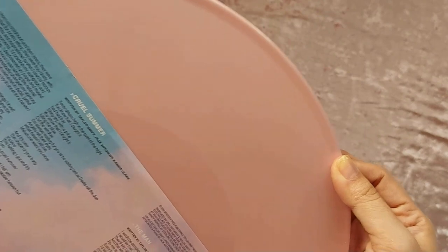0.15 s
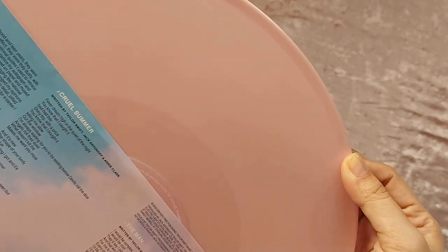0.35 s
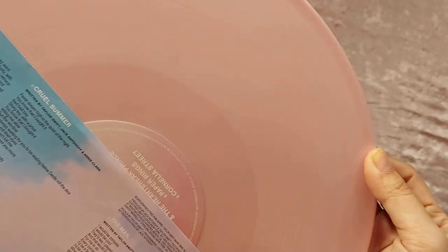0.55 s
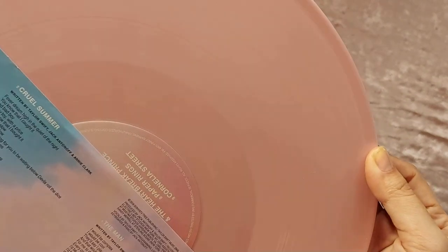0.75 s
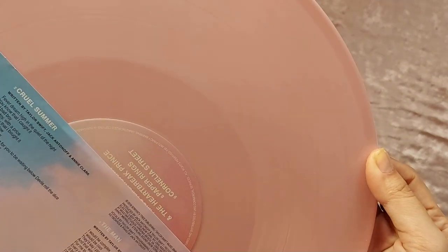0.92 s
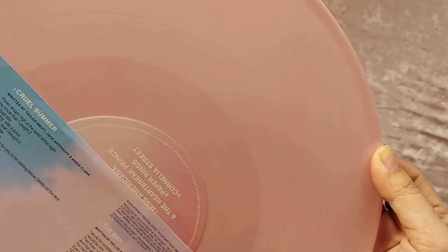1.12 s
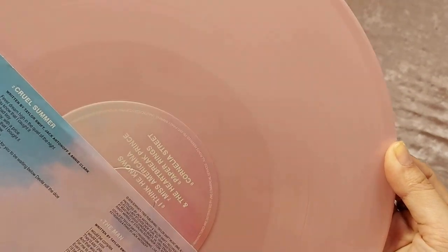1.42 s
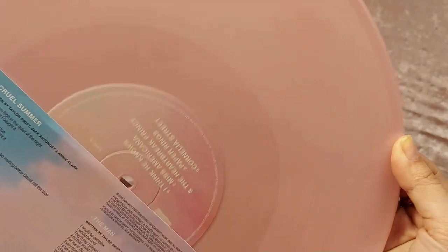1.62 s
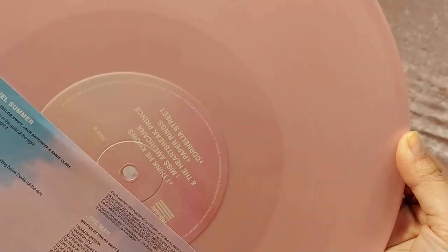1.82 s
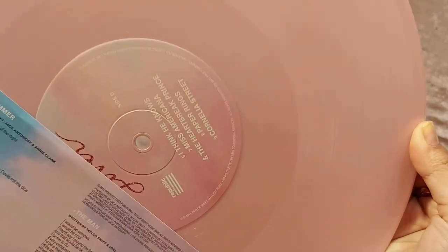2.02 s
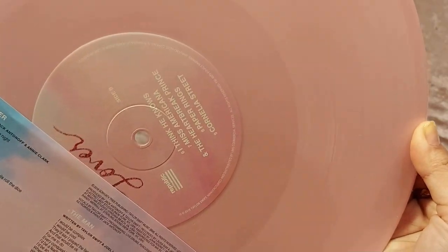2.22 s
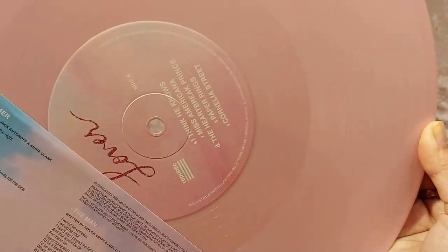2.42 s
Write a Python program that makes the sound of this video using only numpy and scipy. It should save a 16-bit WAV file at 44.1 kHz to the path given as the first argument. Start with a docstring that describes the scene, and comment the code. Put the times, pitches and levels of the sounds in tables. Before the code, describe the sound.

Dry, squeaky paper scraping as a record is eased from its sleeve, close in a quiet room

```python
"""A dry, squeaky paper scrape comes first, close to the microphone in a quiet room with a low hum of air.
A vinyl record is eased out of a paper sleeve in six short tugs: each is hiss mixed with thousands of tiny
gliding whistles, as paper fibres stick and slip. Clear squeaks are bending tones with an octave;
faint rubs, mostly between tugs, are narrow bands of noise, and ticks are very short noise bursts.
The hardest tug overloads the input, which thickens it into a knock."""
import sys
import numpy as np
from scipy import signal
from scipy.fft import rfft, irfft
from scipy.io import wavfile
from scipy.ndimage import uniform_filter1d

SR = 44100
rng = np.random.default_rng(int(sys.argv[2]) if len(sys.argv) > 2 else 0)


def transcribe(u):
    """Save the signal u as a 16-bit wav file named by the first command-line argument.

    u: samples, shape (n,) or (channels, n), limited to [-1, 1]; the rate is SR.
    q: integer samples, one column per channel.
    """
    v = np.clip(np.atleast_2d(u).T, -1, 1)
    q = np.round(v * 32767).astype(np.int16)
    wavfile.write(sys.argv[1], SR, q)


def attenuation_scalar(level_db):
    """Turn a level in dB into a linear amplitude multiplier (20 dB per decade)."""
    decades = np.asarray(level_db, float) / 20
    return 10 ** decades


N = 112454  # length in samples, about 2.55 s

JUDDER_DB = 2.2  # rms depth of the uneven grip
JUDDER_WINDOW = 133  # samples, 3 ms
STREAK_DB = 3.3  # rms depth of the streaks that the sheet's many modes leave across the spectrum


def evened(x):
    """Scales a sound to an rms of 1."""
    return x / np.sqrt(np.mean(x ** 2) + 1e-20)


def slow(size, window):
    """Noise smoothed twice over a window of so many points, at an rms of 1."""
    once = uniform_filter1d(rng.standard_normal(size), window)
    return evened(uniform_filter1d(once, window))


def coloured(x, points):
    """Gives x the spectrum of a (Hz, dB) table, joined by straight lines over log frequency."""
    table_hz, table_db = np.transpose(points)
    hz = np.fft.rfftfreq(len(x), 1 / SR)
    db = np.interp(np.log(hz + 1), np.log(table_hz + 1), table_db)
    return evened(irfft(rfft(x) * attenuation_scalar(db), len(x)))


def band(x, hz, width):
    """Keeps a flat-topped band with steep sides."""
    away = 2 * (np.fft.rfftfreq(len(x), 1 / SR) - hz) / width
    return irfft(rfft(x) / (1 + away ** 4), len(x))


def add(mix, start, sound):
    """Adds a sound at its start in seconds, trimming whatever falls outside the mix."""
    at = round(start * SR)
    part = mix[max(at, 0):][:len(sound) + min(at, 0)]
    part += sound[max(-at, 0):][:len(part)]


# The quiet room as the microphone hears it. Each row: frequency in Hz, relative level in dB.
ROOM_COLOUR = [(32, -13.5), (62, 1), (110, -6), (200, -17), (330, -13), (620, -37.5), (1500, -43),
               (8200, -46.5), (9500, -36.5), (15500, -52.5)]


def room():
    """Steady noise, strongest in the bass, at a low level behind the paper."""
    return attenuation_scalar(-62) * coloured(rng.standard_normal(N), ROOM_COLOUR)


def friction():
    """Stick-slip: hiss with a swarm of short whistles, rising, but falling as the first tug slows."""
    slips_per_s, cycles, spread_db = 4500, 40, 2.6
    draw = rng.random((int(slips_per_s * N / SR), 5))
    at, pitch, long, size, phase = draw.T[:, :, None]
    hz = 900 + 14800 * pitch
    n = np.arange(768)  # samples; no slip outlasts 17 ms
    length = cycles * (.3 + long) * np.sqrt(hz / 5000)  # in cycles of the whistle
    u = np.clip(n * hz / SR / length, 0, 1)  # progress through the slip

    first_release = TUG_MOVES[0][1]
    glide = .06 * np.where(at * N / SR < first_release, -2, 1)  # share of the pitch
    turns = hz * n / SR * (1 + glide * (u - 1) / 2) + phase
    grain = np.sin(np.pi * u) ** 2 * np.sin(2 * np.pi * turns)
    # equal energy first, then many small slips and a few big ones
    grain /= np.linalg.norm(grain, axis=1, keepdims=True)
    grain *= attenuation_scalar(-spread_db * np.log(size + 0.0039))

    place = (at * N).astype(int) + n
    slips = np.bincount(place.ravel(), grain.ravel(), N)[:N]
    share = .6  # of the power, in slips; the rest is plain hiss
    rubbing = np.sqrt(share) * evened(slips) + np.sqrt(1 - share) * rng.standard_normal(N)
    # the grip judders, all pitches together
    return rubbing * attenuation_scalar(JUDDER_DB * slow(N, JUDDER_WINDOW))


# The hand's six tugs: each swells to a grip, drags, and lets go. Each row: grip in seconds,
# release in seconds, level at the grip in dB, level at the release in dB, swell in seconds.
TUG_MOVES = [(0, .07, -28, -51.5, .02), (0.111, 0.264, -37.5, -19, 0.04), (0.513, 0.549, -11.5, -9.5, 0.1),
             (1.393, 1.419, -32, -34.5, 0.076), (1.625, 1.685, -25, -29, 0.068),
             (1.924, 1.999, -36.5, -25.5, 0.069)]
# Colour of each tug, set by where the paper grips: one list per tug.
# Each row of a list: frequency in Hz, relative level in dB.
TUG_COLOURS = [
    [(1800, -32), (2310, -13), (3040, -20), (4740, -0.5), (7800, -14.5), (10300, -7), (15600, -31)],
    [(1400, -46), (2100, -17), (3200, -14.5), (5300, -2.5), (8100, -12.5), (9300, -7), (15600, -16)],
    [(1100, -49), (1800, -36), (2150, -12.5), (3600, -11), (5300, -4), (7800, -11), (9200, -5.5),
     (15600, -14)],
    [(1100, -31.5), (2100, -20.5), (2770, 3), (4500, 0.5), (7100, 1), (9000, -16.5), (12000, 2.5),
     (15600, -20.5)],
    [(1150, -38), (1700, -18), (3300, -6.5), (5600, -0.5), (8000, -13), (9600, -8.5), (11700, -1.5),
     (15600, -17)],
    [(1500, -39), (2250, -24.5), (4300, 0), (5900, -9), (7500, -2), (8900, -13.5), (12100, -2),
     (15600, -12)],
]


def tugs():
    """Each tug takes a stretch of friction, its own streaked colour and the shared pressure shape."""
    let_go_s, skirt_db, skirt_curve = 0.068, -41, 1.19  # level falls by skirt_db one swell or let-go away
    rubbing, out, t = friction(), np.zeros(N), np.arange(N) / SR
    for (grip, release, grip_db, release_db, swell), colour in zip(TUG_MOVES, TUG_COLOURS):
        near = (t > grip - 2 * swell) & (t < release + 2 * let_go_s)
        now = t[near]
        spectrum = rfft(coloured(rubbing[near], colour))
        streaks = slow(8192, 51)  # points spread evenly from 0 Hz to SR / 2
        position = np.linspace(0, 8191, len(spectrum))
        spectrum *= attenuation_scalar(STREAK_DB * np.interp(position, np.arange(8192), streaks))

        before = np.maximum((grip - now) / swell, 0)
        after = np.maximum((now - release) / let_go_s, 0)
        drag_db = np.interp(now, [grip, release], [grip_db, release_db])
        pressure_db = drag_db + skirt_db * (before + after) ** skirt_curve
        out[near] += evened(irfft(spectrum, near.sum())) * attenuation_scalar(pressure_db)
    return out


# Clear squeaks, close to the microphone. Each row: start in seconds, length in seconds,
# start pitch in Hz, end pitch in Hz, level in dB.
CLEAR_SQUEAKS = [(0, .026, 1250, 1000, -45), (0, 0.055, 2380, 2270, -43), (.166, .012, 3130, 3170, -32),
                 (.27, 0.013, 2780, 2930, -32), (.463, .02, 2150, 3300, -28),
                 (.495, 0.017, 2350, 3420, -16), (.505, 0.027, 2100, 2380, -18),
                 (.532, .04, 2000, 2610, -13), (.845, 0.064, 2600, 2640, -62),
                 (1.414, 0.03, 2900, 2700, -34), (1.622, 0.023, 5400, 5760, -27.5),
                 (1.66, 0.02, 1773, 1698, -39), (1.924, 0.018, 2040, 2030, -37),
                 (2.2, .04, 2450, 2460, -65)]


def squeak(start, length, hz0, hz1, db):
    """A steady stick-slip tone that bends quickly to its end pitch and fades, with its octave."""
    bend_s, wobble, octave_db, flutter_db = .0055, .013, -9, 2.2
    t = np.arange(0, length, 1 / SR)
    u = t / length
    hz = hz1 + (hz0 - hz1) * np.exp(-t / bend_s)
    turns = np.cumsum(hz * (1 + wobble * slow(len(u), 38))) / SR
    tone = np.zeros(len(u))
    for k in (1, 2):
        if k * hz1 < SR / 3:
            tone += attenuation_scalar(octave_db * (k - 1)) * np.sin(2 * np.pi * k * turns)
    # full after 15 % of the length, fading over the last 60 %
    ramp = np.minimum(np.minimum(2 * u, (1 - u) / 2) / .3, 1)
    swell = np.sin(np.pi / 2 * ramp) ** 2
    return start, attenuation_scalar(db + flutter_db * slow(len(u), 67)) * tone * swell


# Narrow rubs of the paper, most of them faint and between tugs. Each row: middle in seconds,
# length in seconds, centre in Hz, width in Hz, level in dB.
PAPER_RUBS = [(.62, 0.079, 5250, 300, -55.5), (0.878, .12, 5100, 650, -60.5), (.9, .3, 11500, 7000, -69),
              (1.0363, 0.14, 3715, 920, -45), (.115, .07, 2750, 220, -48), (.255, .06, 1650, 200, -46),
              (1.925, .12, 2050, 160, -52), (1.9, .15, 7300, 800, -58), (1.9, .15, 4350, 450, -61),
              (1.42, .46, 3000, 2600, -71), (.192, .065, 5600, 2500, -28), (2.45, .3, 1050, 300, -75),
              (2.2, 0.12, 4080, 740, -53.5), (2.335, .15, 8300, 1900, -48.5), (2.34, .13, 4400, 500, -64),
              (2.295, 0.11, 6030, 250, -63), (2.315, .21, 12200, 6500, -61), (2.38, 0.22, 1830, 150, -71),
              (2.37, .5, 1800, 5800, -72.5), (1.41, 0.11, 1425, 200, -59), (2.003, 0.055, 3000, 1300, -31),
              (2.55, 0.072, 8700, 830, -59)]


def rub(middle, length, hz, width, db):
    """Grainy, streaked hiss in one band of the paper, swelling fast and trailing off slower."""
    grain_db, skew, curve = 2.9, .75, 1.5  # skew: swell time as a share of the trailing time
    t = np.arange(-length, length, 1 / SR)[:SR]
    spectrum = rfft(band(rng.standard_normal(SR), hz, width))
    streaks = attenuation_scalar(STREAK_DB * slow(len(spectrum), 101))  # window in Hz: the noise lasts one second
    hiss = irfft(spectrum * streaks, SR) * attenuation_scalar(grain_db * slow(SR, JUDDER_WINDOW))
    away = abs(2 * t / length / np.where(t < 0, skew, 1))
    return middle - length, evened(hiss)[:len(t)] * attenuation_scalar(db - 20 * away ** curve)


# Small paper ticks near the microphone. Each row: time in seconds, peak level in dB, centre in Hz.
PAPER_TICKS = [(.107, -26, 6000), (.572, -14, 5590), (2.3096, -40.5, 12410), (2.3316, -41, 8900),
               (2.3481, -41, 8700), (2.4194, -56, 11200)]


def tick(start, db, hz):
    """A fibre snaps: a very short bright burst of noise."""
    decay_s, width = .0015, .33  # width as a share of the centre
    t = np.arange(-100, 400) / SR
    noise = rng.standard_normal(len(t)) * np.exp(-t / decay_s) * (t > 0)
    burst = band(noise, hz, width * hz)
    return start + t[0], attenuation_scalar(db) * burst / abs(burst).max()


def scene():
    """Tugs over the quiet room, with every squeak, rub and tick laid in at its time."""
    mix = tugs() + room()
    for table, source in ((CLEAR_SQUEAKS, squeak), (PAPER_RUBS, rub), (PAPER_TICKS, tick)):
        for row in table:
            add(mix, *source(*row))
    return mix[None]


def overload(dry):
    """The input saturates at a firm knee; a little of the square makes it lopsided."""
    ceiling_db, knee, lopsided = -8.5, 4.5, .03
    over = abs(dry) / attenuation_scalar(ceiling_db)
    full = dry / (1 + over ** knee) ** (1 / knee)
    return full + lopsided * full ** 2


def top_cut(x):
    """Nothing passes above the cut-off."""
    return signal.sosfilt(signal.butter(12, 15790, fs=SR, output="sos"), x)


def record(dry):
    """The close microphone's input overloads, then a steep low-pass at 15.5 kHz limits the band."""
    full = overload(dry)
    lowpass = signal.firwin(255, 15500, window=("kaiser", 8), fs=SR)
    finished = signal.oaconvolve(full, lowpass[None], "same")
    return top_cut(finished)


dry = scene()
out = record(dry)
transcribe(out)
```